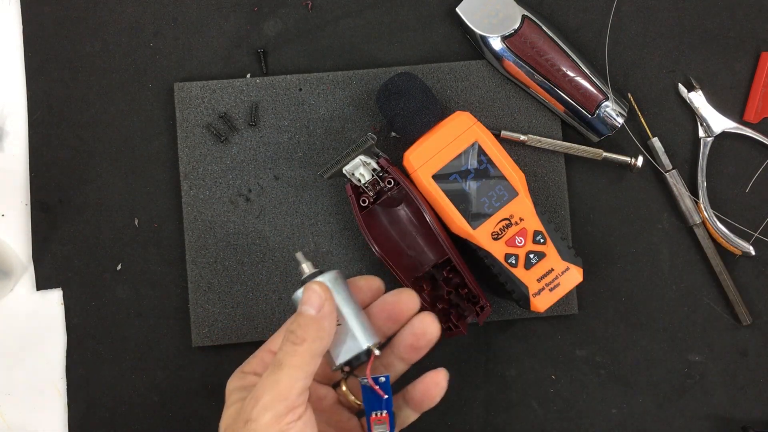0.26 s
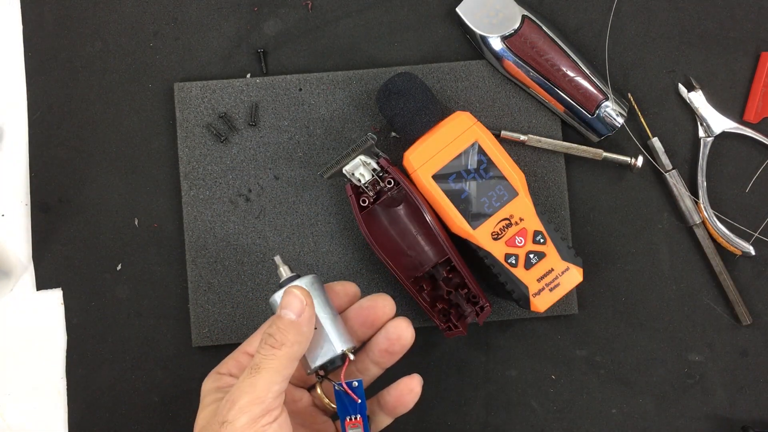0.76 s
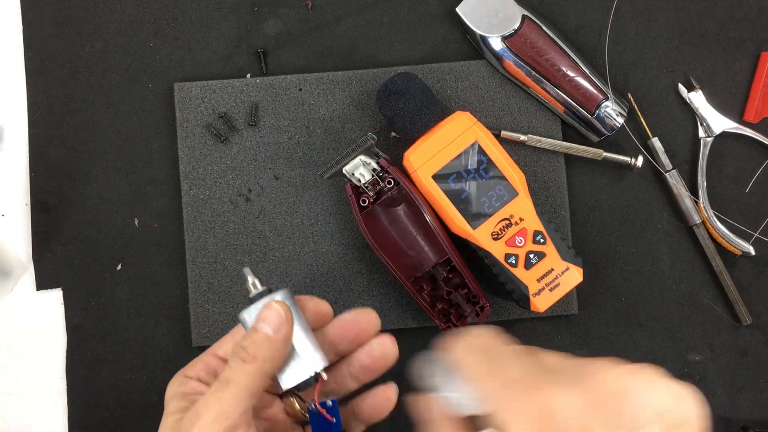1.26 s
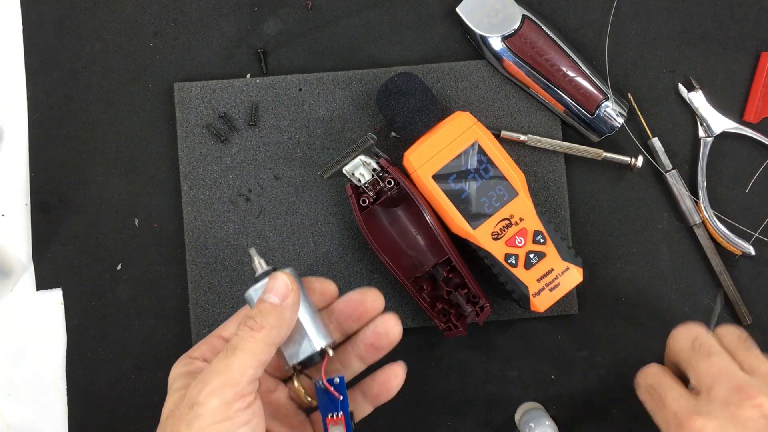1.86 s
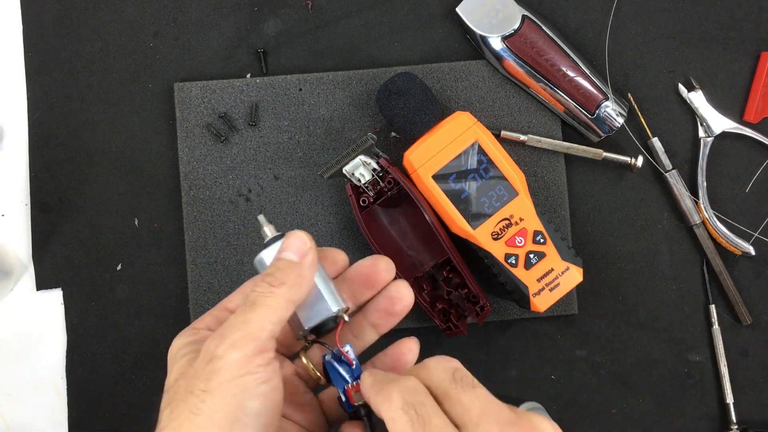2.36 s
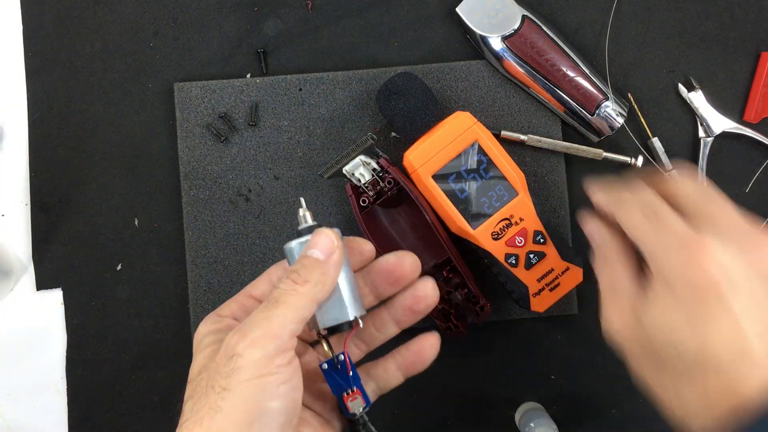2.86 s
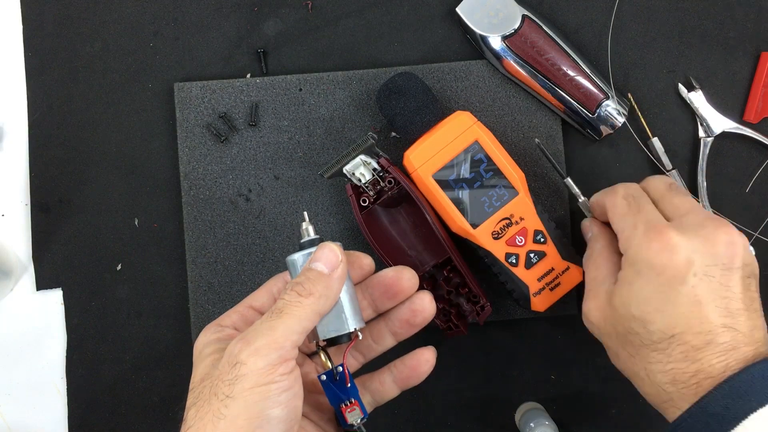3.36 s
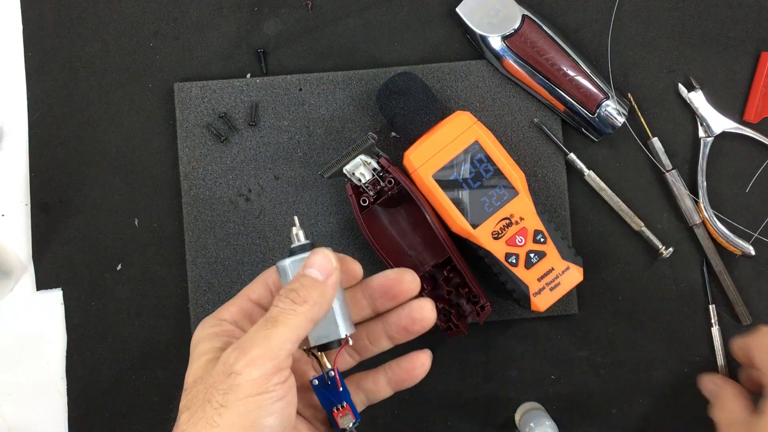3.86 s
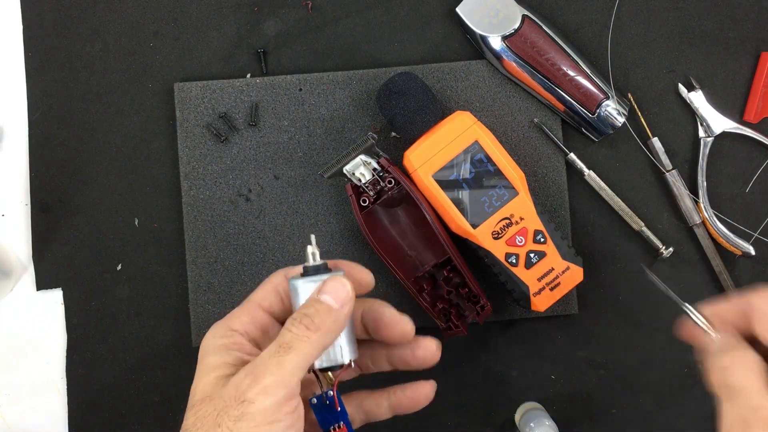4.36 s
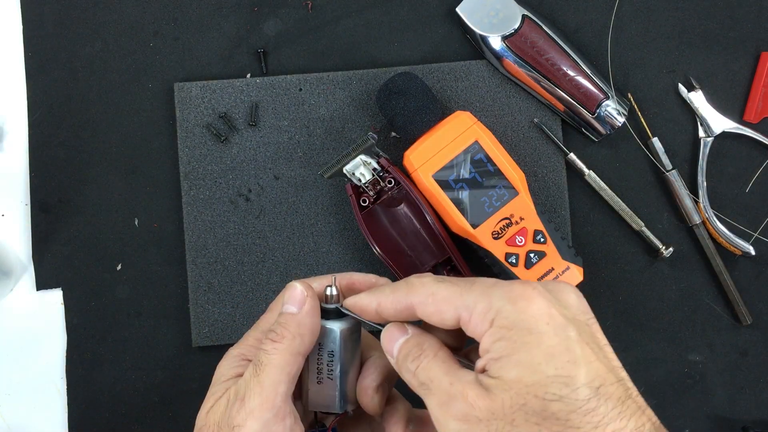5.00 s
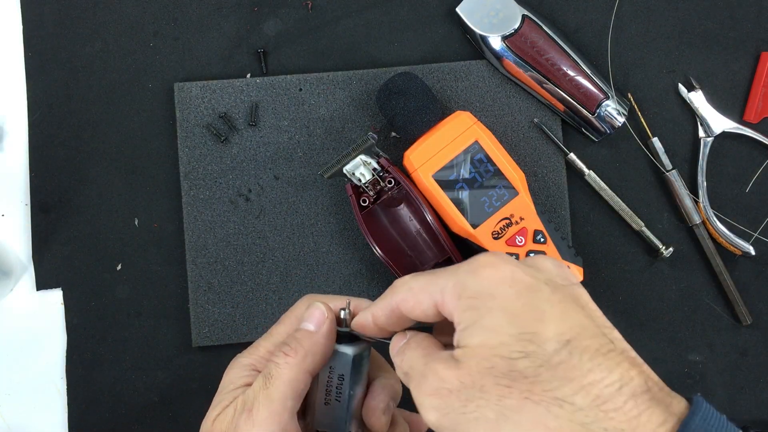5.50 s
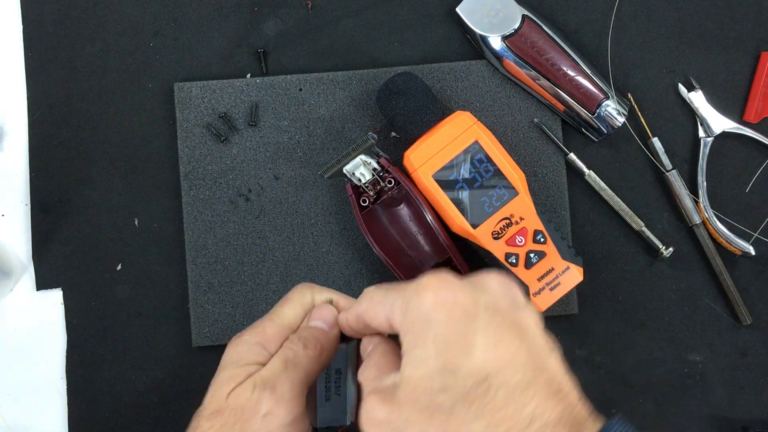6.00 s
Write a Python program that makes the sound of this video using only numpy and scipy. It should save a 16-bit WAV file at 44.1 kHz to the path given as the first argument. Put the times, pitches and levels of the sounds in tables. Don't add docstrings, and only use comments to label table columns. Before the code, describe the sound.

Close to the microphone, a small brushed motor runs steadily for nearly three seconds, a bright rough hiss with a faint hum. A knock and clicks interrupt it midway. A sharp switch snap cuts the power and it runs down within a third of a second. Then come light clicks, a short grainy tool drag on a foam mat and soft taps in a quiet, slightly reverberant workroom with low rumble.

```python
import sys
import numpy as np
from scipy import signal
from scipy.fft import rfft, irfft, next_fast_len
from scipy.io import wavfile
from scipy.ndimage import uniform_filter1d, map_coordinates

SR = 44100
rng = np.random.default_rng(int(sys.argv[2]) if len(sys.argv) > 2 else 0)


def dump(signal):
    limited = np.clip(np.atleast_2d(signal).T, -1, 1)
    pcm = np.round(limited * 32767).astype(np.int16)
    wavfile.write(sys.argv[1], SR, pcm)


def magnitude_from_level(level_db):
    exponent = np.asarray(level_db, float) / 20
    return 10 ** exponent


N = 275184


def unit(x):
    return x / np.sqrt(np.mean(x ** 2) + 1e-20)


def along(points, hz):
    f, v = np.transpose(points)
    return np.interp(np.log(hz + 1), np.log(f + 1), v)


def curves(rows, outside=None):
    s, *cols = np.transpose(rows)
    return [np.interp(np.arange(N) / SR, s, c, outside, outside) for c in cols]


def wobble(rate_hz):
    knots = rng.standard_normal(int(N * rate_hz / SR) + 4)
    return map_coordinates(knots, [np.arange(N) * rate_hz / SR])


def filtered(x, response):
    m = next_fast_len(len(x) + 8192)
    return irfft(rfft(x, m) * response(np.fft.rfftfreq(m, 1 / SR)), m)[:len(x)]


def modes(table):
    def response(f):
        total = 0
        for k, (hz, width_hz, db) in enumerate(table):
            damping = 1j * f * width_hz
            total = total + (-1) ** k * magnitude_from_level(db) * damping / (hz * hz - f * f + damping)
        return total
    return response


def hiss(spectrum):
    return unit(filtered(rng.standard_normal(N), lambda hz: magnitude_from_level(along(spectrum, hz))))


def distant_engine():
    # start_s, pitch_hz, level_db
    note = [(2.9, 65.3, -61), (3.48, 66.2, -55.5), (3.68, 64.5, -59.5), (3.69, 66, -78),
            (3.75, 66.9, -59.5), (4.18, 65.7, -64.5), (4.25, 63.8, -68), (4.31, 59.3, -56), (4.51, 61, -63),
            (4.55, 61.6, -56), (4.79, 61.5, -50), (4.85, 61.24, -60), (5.07, 61.6, -50), (5.11, 60.7, -55),
            (5.29, 62.4, -54.5), (5.33, 61.4, -82), (5.57, 65.8, -52), (5.72, 65.1, -66),
            (5.87, 63.85, -50.5), (6.24, 62, -45)]
    pitch_hz, _ = curves(note)
    _, level_db = curves(note, outside=-120)
    return magnitude_from_level(level_db + 5.5) * np.sin(2 * np.pi * np.cumsum(pitch_hz) / SR)


def idling_machine():
    # start_s, pitch_hz, level_db, octave_level_db
    note = [(0.3, 47.8, -79, -75), (0.65, 49.26, -55, -65), (0.8, 47.7, -53, -51.5),
            (1.2, 48.5, -51.5, -56.5), (1.6, 48.03, -52, -50.5), (1.75, 48.8, -52, -82),
            (2.0, 48.7, -74, -60), (2.3, 48.5, -62, -68), (2.9, 49.3, -73, -57)]
    phase = 2 * np.pi * np.cumsum(curves(note)[0]) / SR
    _, first_db, octave_db = curves(note, outside=-120)
    first = magnitude_from_level(first_db + 3.3 * wobble(6.7)) * np.sin(phase)
    return first + magnitude_from_level(octave_db + 2.7 * wobble(5)) * np.sin(2 * phase)


def room_tone():
    # start_s, rumble_db, air_db
    levels = [(0.0, -51.5, -63), (0.68, -55, -59), (0.89, -53.5, -59.5), (0.99, -50.5, -61.5),
              (1.18, -54, -64.5), (1.48, -62, -59), (1.63, -55, -61), (1.82, -56, -63), (2.12, -52, -63.5),
              (2.29, -54.5, -59), (2.4, -46.5, -51), (2.61, -55.5, -65.5), (2.87, -56, -61.5),
              (3.27, -51.5, -62), (3.46, -56, -58.5), (3.58, -58.5, -61), (4.28, -54, -62),
              (4.45, -57.5, -60.5), (4.62, -56, -62), (5.18, -54.5, -63), (5.49, -50, -63),
              (5.84, -51.5, -62.5), (6.0, -54.5, -62.5), (6.14, -53.5, -61.5), (6.24, -50, -62.5)]
    # pitch_hz, density_db_per_hz
    rumble = [(12, -45.5), (20, -28), (40, -5), (59, -0.5), (75, 0), (150, -16.5), (200, -40), (330, -120)]
    air = [(80, -30), (125, -3), (195, 0), (235, -11), (340, -13.5), (600, -16), (950, -19.5), (1700, -25),
           (2400, -30), (4500, -37), (6500, -35.5), (10500, -38), (11500, -31), (16000, -33.5)]
    rumble_db, air_db = curves(levels)
    noise = magnitude_from_level(rumble_db - 0.5) * hiss(rumble) + magnitude_from_level(air_db + 1.5 + 0.6 * wobble(5)) * hiss(air)
    return noise + distant_engine() + idling_machine()


def brushes(turns, scatter_db, chatter_db, scrape_s, slide_share):
    bars = [0, -1.5, -2, -2.5, -1]
    bar = np.floor(len(bars) * turns).astype(int)
    edge = np.diff(bar, prepend=0) > 0
    scatter = rng.standard_normal(bar[-1] + 1)[bar]
    force_db = np.asarray(bars)[bar % len(bars)] + scatter_db * scatter
    scrape = signal.lfilter([1], [1, -np.exp(-1 / (SR * scrape_s))], edge * magnitude_from_level(force_db))
    contact = unit(scrape) + slide_share
    return unit(contact * magnitude_from_level(chatter_db * (0.68 * wobble(55) + 0.86 * wobble(130))))


def shimmer(x, depth_db, beam_db, beam_hz, shadow_hz):
    # start_s, beam_1_hz, beam_2_hz, beam_3_hz, beam_4_hz
    beams = [(0.0, 5820, 9650, 11800, 13600), (0.15, 5640, 9590, 11300, 13200),
             (0.79, 6140, 9830, 11250, 14200), (1.07, 6100, 9830, 11200, 13700),
             (1.26, 5800, 9640, 11400, 13700), (1.35, 5970, 9960, 11100, 13400),
             (1.55, 5530, 9630, 11300, 13300), (1.73, 5600, 9630, 11300, 13800),
             (2.15, 5600, 9820, 11300, 13200), (2.33, 5680, 9700, 11400, 13800),
             (2.52, 5600, 9960, 11000, 13300), (2.62, 5650, 9660, 11700, 13700),
             (3.03, 5870, 9840, 11200, 13600), (3.1, 5740, 9960, 11400, 13200)]
    # start_s, pitch_hz, depth_db
    shadow = [(0, 4500, -0.5), (0.6, 4400, -0.5), (1.2, 4660, 1), (1.45, 4500, -4), (2.0, 4750, -2.5),
              (2.4, 4600, 0.5), (3.0, 4460, 6)]
    hz, t, z = signal.stft(x, SR, nperseg=512)
    field = uniform_filter1d(uniform_filter1d(rng.standard_normal(z.shape), 5, 0), 30, 1)
    mottle_db = depth_db * unit(field) * np.clip(hz[:, None] / 9000, 0.4, 1)

    def bump(s, centre_hz, width_hz):
        return np.exp(-((hz[:, None] - np.interp(t, s, centre_hz)) / width_hz) ** 2)

    s, *centres_hz = np.transpose(beams)
    beams_db = beam_db * sum(bump(s, c, beam_hz) for c in centres_hz)
    s, centre_hz, dip_db = np.transpose(shadow)
    shadow_db = np.interp(t, s, dip_db) * bump(s, centre_hz, shadow_hz)
    return signal.istft(z * magnitude_from_level(mottle_db + beams_db + shadow_db), SR, nperseg=512)[1][:N]


def hum(turns, speed):
    # multiple, rms_db
    running = [(6, -73), (9, -74), (10, -67), (14, -75), (15, -74), (16, -74), (20, -77), (26, -79),
               (74, -79), (75, -78)]
    cogging = [(10, -65), (15, -66), (20, -68), (25, -70), (30, -70), (40, -71)]
    # pitch_hz, width_hz
    wall_mode = (930, 110)

    def tone(multiple, db):
        return magnitude_from_level(db + 5.5 + 1.6 * wobble(6.99)) * np.sin(2 * np.pi * (multiple * turns + rng.random()))

    powered = uniform_filter1d(1.0 * (speed >= speed[0]), 300)
    centre_hz, width_hz = wall_mode
    coasting = sum(tone(k, db) / (1 + ((k * speed - centre_hz) / width_hz) ** 2) for k, db in cogging)
    return powered * sum(tone(k, db) for k, db in running) + (1 - powered) * coasting


def motor():
    # start_s, turns_per_s
    shaft = [(0, 103.5), (2.893, 103.5), (2.97, 79), (3.02, 63.5), (3.075, 48), (3.17, 21), (3.176, 0),
             (3.3, 0)]
    # start_s, wall_db, cap_db, brush_db, spring_db
    facing = [
        [(0.0, -50.5, -47.5, -50, -47.5), (0.32, -50, -46.5, -50, -46), (0.59, -50.5, -49, -50.5, -47.5),
         (0.84, -50.5, -49.5, -46.5, -46.5), (1.08, -50.5, -49.5, -47.5, -49.5), (1.38, -50, -47.5, -48.5, -50),
         (1.78, -50, -49.5, -50, -48.5), (2.1, -50, -46.5, -51.5, -47.5), (2.46, -50, -48.5, -48.5, -49),
         (2.71, -51, -47.5, -47.5, -49.5), (2.79, -51, -47.5, -50.5, -48), (2.88, -51, -46, -47, -46)],
        [(2.905, -51, -48, -51, -49), (2.973, -55, -56.5, -54, -56), (3.025, -54, -50.5, -55, -52),
         (3.093, -59, -65, -61, -62), (3.139, -61.5, -66.5, -71, -71), (3.24, -94, -95, -97, -86)],
    ]
    # pitch_hz, width_hz, level_db
    wall = [(640, 200, -6.5), (1002, 121, -4.5), (1450, 790, -8), (2033, 233, -0.5), (2676, 340, 0),
            (3730, 900, -4.5), (5600, 820, -2.5), (6970, 640, -7)]
    cap = [(8800, 2400, -12), (9570, 590, -3.5), (10110, 520, -7.5)]
    brush = [(11000, 700, 0), (11800, 800, -2), (12400, 600, -6)]
    spring = [(13300, 820, 2), (14400, 520, 3.5), (14800, 1100, -0.5), (15800, 440, 0.5)]
    speed, = curves(shaft)
    turns = np.cumsum(speed * (1 + 0.0012 * wobble(6))) / SR
    pace = (speed / speed[0]) ** 0.54
    rough = brushes(turns, scatter_db=3.5, chatter_db=1.17, scrape_s=0.00092, slide_share=0.9 * pace)
    smooth = brushes(turns, scatter_db=3.5, chatter_db=-0.17, scrape_s=0.0012, slide_share=1.1 * pace)
    levels_db = curves([*facing[0], *facing[1]], outside=-120)
    contacts = (smooth, rough, rough, rough)
    sound = np.zeros(N)
    for level_db, body, contact in zip(levels_db, (wall, cap, brush, spring), contacts):
        ring = filtered(contact * rng.standard_normal(N), modes(body))
        local_rms = np.sqrt(np.abs(uniform_filter1d(ring ** 2, SR // 10)) + 1e-12)
        sound += magnitude_from_level(level_db) * ring / local_rms
    sound = shimmer(sound, depth_db=1.9, beam_db=4.5, beam_hz=250, shadow_hz=450)
    return sound + hum(turns, speed)


def bench():
    # start_s, peak_db, ring_hz, t60_s
    thumps = [(1.95, -39.5, 1280, .025), (2.354, -33.5, 109.2, 0.18), (2.367, -24.5, 280, 0.03),
              (2.369, -20, 507, 0.015), (2.372, -29.5, 209, 0.22), (2.379, -34, 415.3, 0.036),
              (2.397, -44.5, 347, 0.14), (3.405, -37, 410, 0.044), (4.27, -40, 407, 0.015),
              (4.93, -38.5, 392, 0.032), (5.248, -45, 950, 0.021)]
    out, t = np.zeros(N + SR), np.arange(SR // 2) / SR
    for s, db, hz, t60_s in thumps:
        ring = np.sin(2 * np.pi * hz * t) * (1 - np.exp(-t / 0.002))
        out[round(s * SR):][:len(t)] += magnitude_from_level(db - 60 * t / t60_s) * ring
    return out[:N]


def clicks():
    # start_s, peak_db, ring_hz, low_db, high_db, t60_s
    contacts = [(2.3475, -18.5, 1500, -17, -17.5, 0.026), (2.3668, -13.5, 1400, -19, -15, 0.011),
                (2.3804, -33, 9730, -16, -14, 0.02), (2.4792, -18, 1393, -6.5, -13.5, 0.022),
                (3.4024, -33, 1310, -10, -10.5, 0.037), (3.4314, -37, 3030, -10, -15, 0.017),
                (3.4401, -30.5, 3240, -15, -17, 0.025), (3.455, -24.5, 10800, -13, -8.5, 0.021),
                (3.4804, -34, 10700, -18, -13, 0.022), (3.497, -37, 1700, -15, -17, 0.02),
                (3.5056, -32, 2080, -15, -12, 0.02), (3.5155, -30.5, 2520, -11, -20, 0.019),
                (3.5249, -33, 2410, -4, -13, 0.02), (3.5404, -39, 1730, -21, -17, 0.022),
                (3.5824, -44, 1200, -19, -11, 0.02), (3.8568, -36.5, 10600, -55, 3, 0.021),
                (3.876, -46, 1260, -20, -9, 0.02), (3.92, -44.5, 1760, -17, -9, 0.017),
                (3.933, -47, 11100, -38, -3, 0.025), (4.3186, -35.5, 1380, -15, -22, 0.015),
                (4.335, -41, 1450, -21, -21, 0.017), (4.3715, -44, 1445, -11.5, -31, 0.02),
                (4.4408, -17, 1380, -10, -23.5, 0.019), (4.4957, -50, 1250, -6, -20, 0.02),
                (4.5802, -19.5, 2610, -5.5, -13, 0.019), (4.779, -42.5, 8980, -29, 2, 0.021),
                (4.8094, -57, 1030, -19.5, -7, 0.02), (5.248, -35.5, 6370, -20, -1.5, 0.023),
                (5.9858, -56, 1080, 1.5, -11.5, 0.019), (6.0866, -48.5, 1270, -7, -6, 0.02)]
    low = modes([(1296, 560, -2), (1700, 96, 4.5), (2470, 450, -1.5), (3230, 570, -4.5)])
    middle = modes([(4400, 1100, 5.5), (6280, 440, 4), (7340, 430, -1.5)])
    high = modes([(9000, 6700, 0), (12900, 7000, 0)])
    out, t = np.zeros(N + SR), np.arange(SR // 8) / SR
    for s, db, hz, low_db, high_db, t60_s in contacts:
        decay = magnitude_from_level(-60 * t / t60_s)
        envelope = (decay + 1.4 * magnitude_from_level(-60 * t / 0.0033)) * (1 - np.exp(-t / 0.0007))
        bursts = rng.standard_normal((3, len(t))) * envelope
        parts = [filtered(b, band) for b, band in zip(bursts, (low, middle, high))]
        low_part, middle_part, high_part = [p / np.abs(p).max() for p in parts]
        click = magnitude_from_level(low_db) * low_part + magnitude_from_level(high_db) * high_part
        click += magnitude_from_level(0.5 * (low_db + high_db) + 0.5) * middle_part
        click += magnitude_from_level(-7) * np.sin(2 * np.pi * hz * t) * decay * (1 - np.exp(-t / 0.0006))
        out[round(s * SR):][:len(t)] += magnitude_from_level(db) * click
    return filtered(out[:N], lambda f: (1j * f / (1j * f + 800)) ** 3)


def switch():
    # start_s, peak_db
    snap = [
        (2.8924, -21),
        (2.8931, -6),
        (2.8936, 0),
        (2.8944, -14),
    ]
    # pitch_hz, width_hz, level_db
    housing = [(1500, 700, -27), (2700, 670, -12), (4300, 1200, -12.5), (5700, 420, -8), (8800, 910, -12.5),
               (11000, 1100, -4), (13400, 1000, 3)]
    blows = np.zeros(N)
    for s, db in snap:
        blows[round(s * SR)] = magnitude_from_level(db + 6.5)
    t = np.arange(SR // 10) / SR
    rattle = magnitude_from_level(-18.5 - 60 * t / 0.031) * rng.standard_normal(len(t))
    blows[round(snap[-1][0] * SR):][:len(t)] += rattle
    return filtered(blows, modes(housing))


def sliding():
    # start_s, low_db, high_db
    slides = [
        [(3.4, -60, -73), (3.43, -72, -64), (3.46, -51.5, -47), (3.485, -59.5, -55), (3.52, -55, -47),
         (3.55, -57, -52), (3.565, -72, -68), (3.6, -77, -70), (3.66, -79, -77)],
        [(3.85, -82, -69), (3.87, -76, -62), (3.93, -81, -84), (4.0, -85, -81)],
        [(4.27, -82, -90), (4.33, -80, -88), (4.4, -81, -89), (4.425, -64, -49), (4.44, -68, -60),
         (4.46, -81, -75), (4.5, -62, -71), (4.55, -83, -82), (4.575, -61, -80), (4.6, -57, -78),
         (4.63, -68, -70), (4.69, -95, -76)],
        [(4.78, -82, -70), (4.81, -82, -69), (4.84, -80, -77), (4.89, -73, -66), (4.93, -80, -73),
         (5.0, -88, -85)],
        [(5.3, -90, -90), (5.42, -80, -84), (5.6, -82, -84), (5.75, -90, -90)],
        [(5.95, -88, -84), (6.05, -74, -76), (6.11, -88, -77), (6.16, -77, -64), (6.2, -71, -78.5),
         (6.24, -90, -88)],
    ]
    # pitch_hz, density_db_per_hz
    mat_low = [(700, -35), (1000, 12), (1700, -3), (2500, 6), (3300, -2.5), (4500, -12), (6000, -53)]
    mat_high = [(2500, -29), (3800, -19), (5500, -9), (7500, -11), (10500, -7), (13500, -14), (16000, -7)]
    grain = magnitude_from_level(1.9 * wobble(150) + 2.55 * wobble(600))
    low = unit(grain ** 0.6 * hiss(mat_low))
    high = unit(grain * hiss(mat_high))
    strokes = [curves(stroke, outside=-120) for stroke in slides]
    return sum(magnitude_from_level(low_db) * low + magnitude_from_level(high_db) * high for low_db, high_db in strokes)


def echo(x):
    # pitch_hz, t60_s
    walls = [(200, 0.1), (2000, .25), (10000, 0.078)]
    hz, t, z = signal.stft(rng.standard_normal(SR // 2), SR, nperseg=256)
    decay = magnitude_from_level(-60 * t / along(walls, hz)[:, None])
    tail = signal.istft(z * decay, SR, nperseg=256)[1]
    delayed = np.pad(x, (300, 0))
    return signal.fftconvolve(delayed, tail / np.linalg.norm(tail))[:N]


def scene():
    whirr = motor()
    hits = clicks() + switch() + bench()
    answer = echo(magnitude_from_level(-17.5) * hits + magnitude_from_level(-15) * whirr)
    return (whirr + hits + answer + sliding() + room_tone())[None]


def low_pass(x):
    return signal.sosfilt(signal.butter(12, 17010, fs=SR, output="sos"), x)


def record(dry):
    top_hz, burst_top_hz = 15850, 16900
    power = filtered(dry[0], lambda hz: hz > 6000) ** 2
    sudden = uniform_filter1d(power, 64) > 40 * uniform_filter1d(power, 4096, origin=2000)
    opening = np.clip(64 * uniform_filter1d(1.0 * sudden, 200), 0, 1)
    extra = filtered(dry[0], lambda hz: (hz >= top_hz) & (hz < burst_top_hz))
    usual = filtered(dry[0], lambda hz: hz < top_hz)
    kept = usual + magnitude_from_level(-4) * uniform_filter1d(opening, 64) * extra
    return low_pass(kept[None])


dry = scene()
out = record(dry)
dump(out)
```